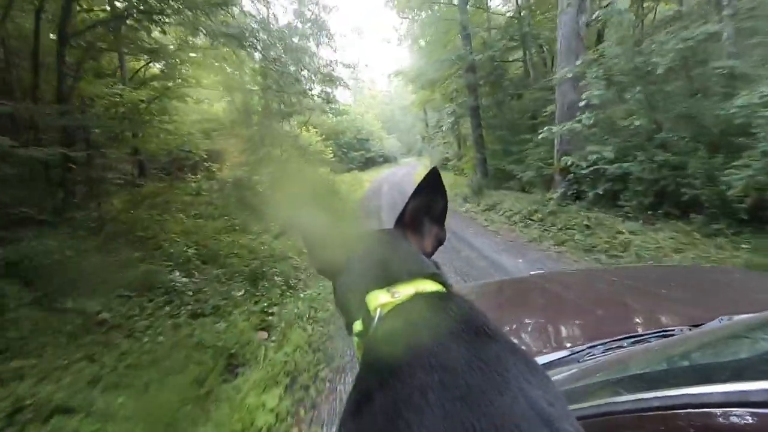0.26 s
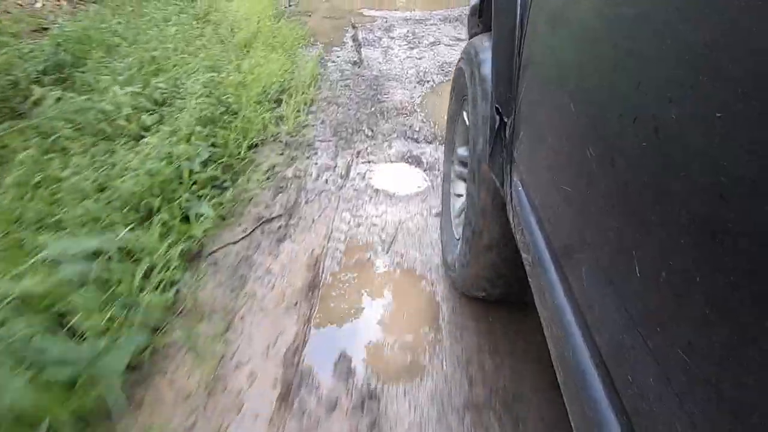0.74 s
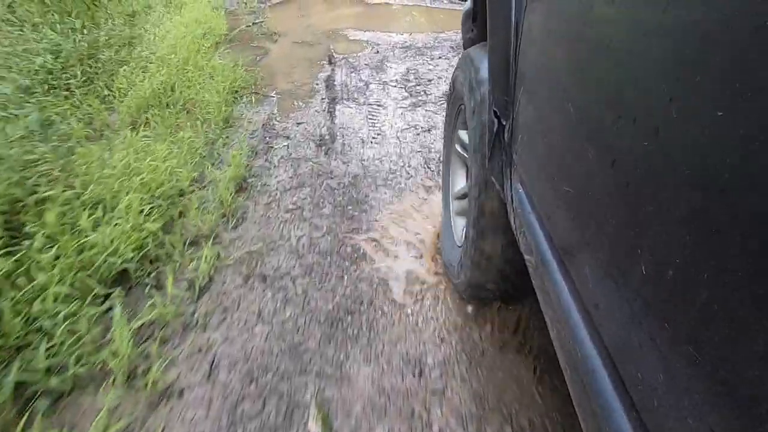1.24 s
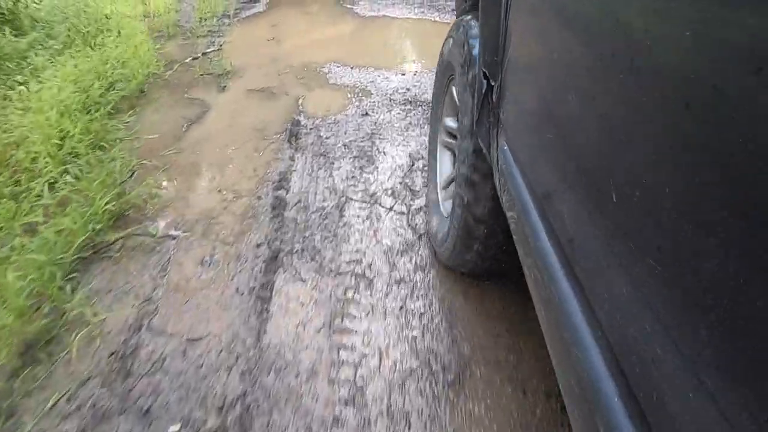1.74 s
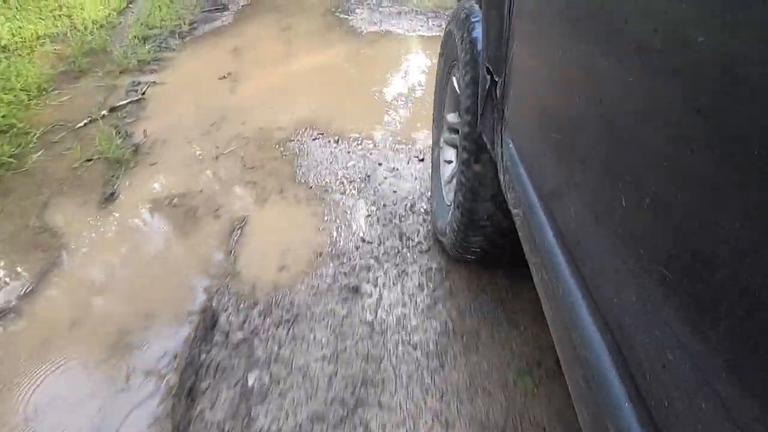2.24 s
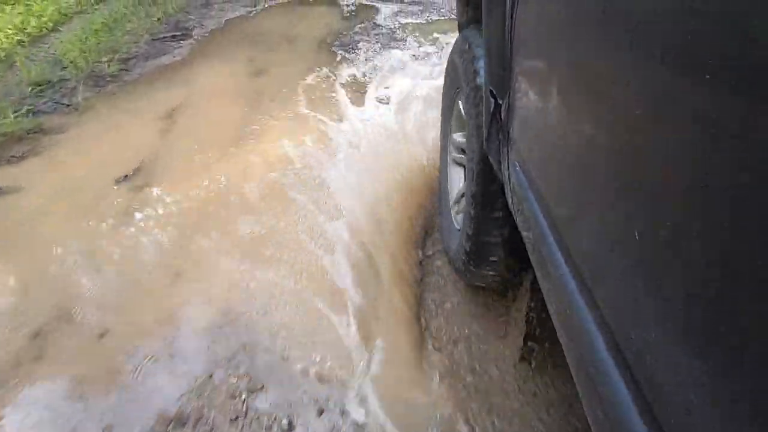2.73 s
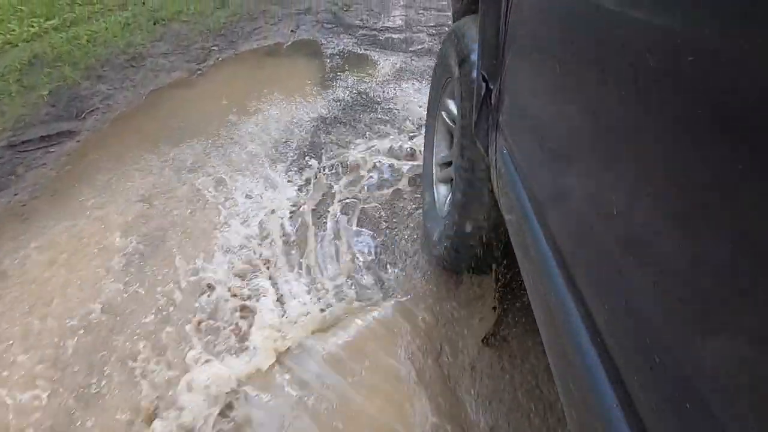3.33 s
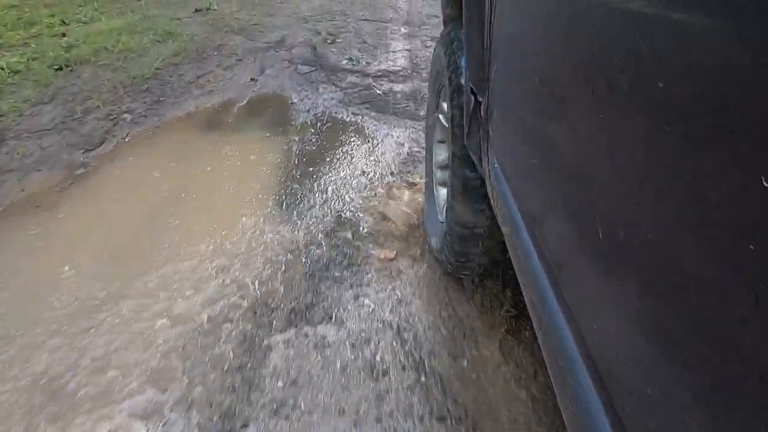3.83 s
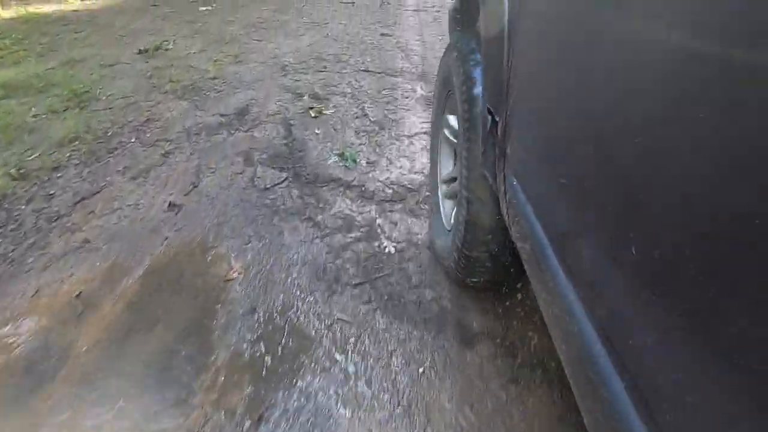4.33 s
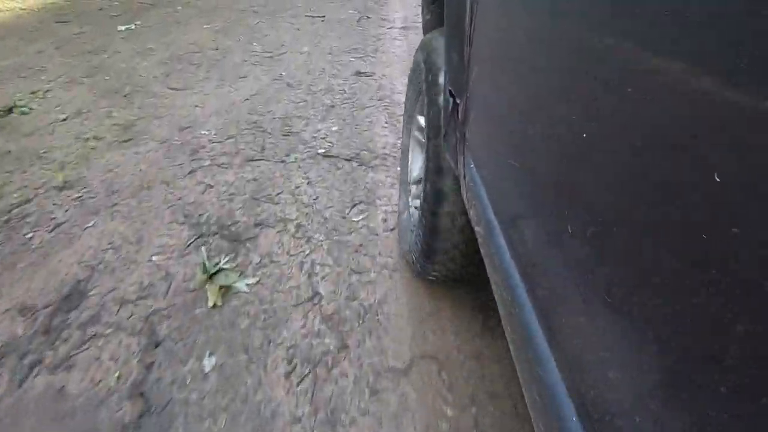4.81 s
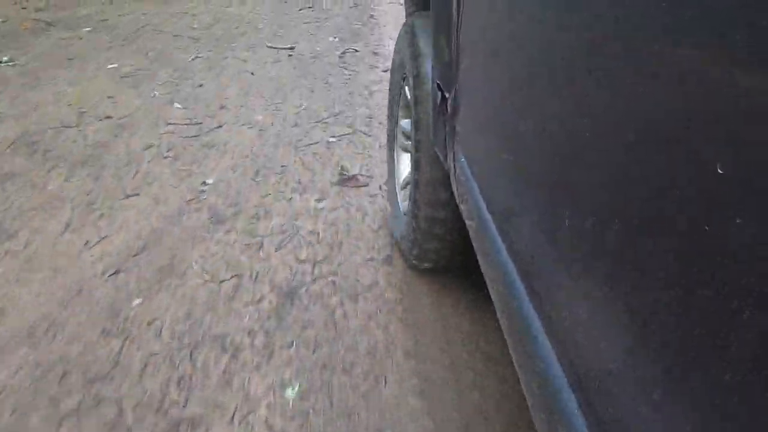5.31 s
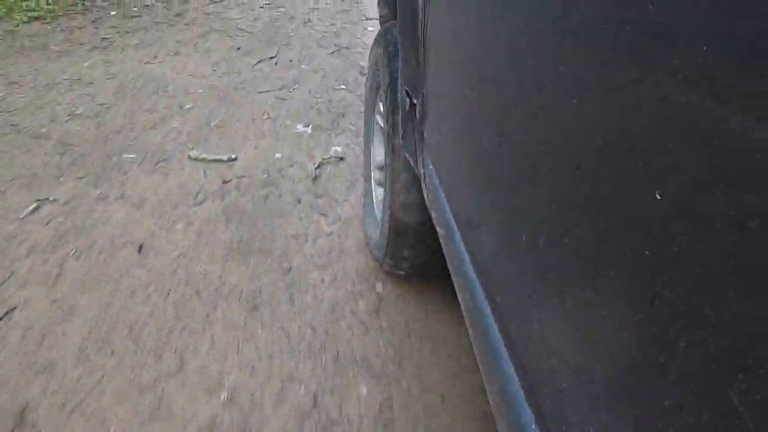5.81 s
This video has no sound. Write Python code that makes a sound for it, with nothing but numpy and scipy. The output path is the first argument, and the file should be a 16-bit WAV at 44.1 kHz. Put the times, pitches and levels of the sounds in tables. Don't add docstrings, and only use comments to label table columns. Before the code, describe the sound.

From 0 to 0.5 s, strong muffled wind buffets a small camera on a moving pickup, with uneven low thumps, fluttering slaps and a few sharper flaps. At about 0.53 s it cuts with a small click to the front wheel, very close and dry. A low, even V8 idle drones under tyre rumble on mud; splashes, wet plops and gravel ticks cluster from 1.1 to 1.6 s, then thin out around 2 s. From 2.4 s water froths, and between 2.75 and 3.5 s a deep puddle bursts in heavy plops, slosh and spray. The engine revs up from 3 s into a rougher burble, dips slightly near 4.5 s, then climbs again. From 3.3 to 4.35 s dull mono opens into brighter stereo. A hissing spray passes at 4.3-4.7 s; damp road noise, occasional plops, grit and soft wind puffs continue until the cut at 6 s.

```python
import sys
import numpy as np
from scipy import signal
from scipy.fft import rfft, irfft
from scipy.io import wavfile
from scipy.ndimage import uniform_filter1d

SR = 44100
rng = np.random.default_rng(int(sys.argv[2]) if len(sys.argv) > 2 else 0)


def wrap_up_sound(samples):
    columns = np.atleast_2d(samples).T
    tamed = np.clip(columns, -1, 1)
    steps = np.round(tamed * 32767).astype(np.int16)
    wavfile.write(sys.argv[1], SR, steps)


def ratio_of_db(decibels):
    return 10 ** (np.asarray(decibels, float) / 20)


N = 267246
T = np.arange(N) / SR
CUT_S, SPLICE_S = .5283, .002


def wheel():
    mid, side = tyre()
    impacts = plops()
    low_share = pair_shares()[0]
    bass_share = np.maximum(low_share - BASS_LATE, 0)
    return mid + impacts, side + bass_share * (puffs() - 0.41 * impacts)


# t/s, firmness as rumble level/dB
GROUND = [(.55, -37), (1.0, -32), (1.25, -30), (1.5, -29.5), (1.8, -29), (2.2, -32.5), (2.35, -28.5),
          (2.42, -40), (2.76, -31.5), (2.88, -28), (3.45, -27), (3.65, -29.5), (4.15, -26.5), (4.5, -28),
          (5.2, -29), (5.6, -28.5), (6.06, -28)]
# t/s of the peak, spray level/dB, rise/s, fall/s, depth as slosh over spray/dB
SPLASHES = [(.541, -29.5, 0.027, 0.0094, -7), (.79, -33.5, 0.36, 0.16, -7), (.93, -49, 0.018, 0.026, 17.5),
            (1.19, -28.5, 0.014, 0.04, -2), (1.309, -30.5, 0.13, 0.21, -1), (1.45, -32, 0.098, 0.14, -9),
            (1.569, -34, 0.074, 0.071, 1.5), (1.73, -33, 0.091, 0.15, -4), (2.2, -48.5, 0.17, 0.16, 16.5),
            (2.31, -34, 0.012, 0.067, 4), (2.389, -39.5, 0.019, 0.12, 13.5), (2.54, -40, 0.11, 0.13, 12.5),
            (2.63, -37.5, 0.076, 0.13, -16), (2.78, -37, 0.097, 0.022, 13),
            (2.87, -40.5, 0.041, 0.087, 17.5), (2.97, -48.5, 0.055, 0.48, 21), (2.7, -42, 0.042, .05, 12),
            (3.06, -36, 0.031, 0.051, 8), (3.21, -45.5, 0.03, 0.023, 22), (4.46, -35.5, 0.026, 0.15, -21),
            (4.62, -32, .04, .06, -19), (5.2, -34.5, .06, 0.087, 2), (5.62, -36.5, .05, 0.13, -10),
            (5.94, -42, 0.036, .04, -9), (3.47, -32.5, 0.033, 0.063, -5), (3.25, -30.5, 0.66, 0.34, -1.5),
            (3.435, -34.5, 0.038, 0.038, 7), (3.8, -37, 0.028, 0.24, 6.5), (4.1, -39.5, 0.41, 0.47, 8.5),
            (4.4, -52, 0.097, 0.17, 8), (4.72, -34.5, 0.28, 0.053, -0.5), (4.9, -38, 0.073, 0.3, 4.5),
            (5.08, -49, 0.042, 0.12, 19)]
# t/s of the peak, level/dB, rise/s, fall/s
MIST = [(1.2, -57, 0.012, 0.039), (1.42, -59, 0.068, 0.15), (1.57, -61, 0.06, 0.068),
        (2.31, -51, 0.009, 0.031), (2.39, -56, 0.035, 0.017), (2.97, -55, 0.056, 0.042),
        (3.25, -52, 0.22, 0.41), (3.44, -49.5, .021, 0.18), (3.79, -47, 0.0068, 0.047),
        (4.2, -44, 0.24, 0.24), (4.32, -38, 0.037, 0.065), (4.49, -33, 0.11, 0.23),
        (4.95, -42, 0.073, 0.07), (5.18, -43, 0.13, 0.77), (5.93, -38, 0.028, 0.028)]
# level/dB at the sheltered port, level/dB at the open pair
DAMP = [
    (-40, -35),
    (-48, -38),
    (-65.5, -51),
]
WHEEL_HZ = [300, 900, 2700, 8500, 12000]
# f/Hz, level/dB a third octave against
ROLLING_COLOUR = [(25, -16), (40, -8), (70, -1.5), (110, -4.5), (170, -3.5),
                  (250, -6), (400, -7.5), (600, -7.5), (900, -6), (1500, -4), (2350, -3), (3700, -4.5),
                (4700, -7), (5900, -7.5), (7450, -5), (9400, -5.5), (11800, -9.5), (14900, -17)]


def tyre():
    opened = pair_shares()[1] / BLEND[-1][2]
    slosh_floor, spray_floor, hiss_floor = [shut + opened * (wide - shut) for shut, wide in DAMP]
    slosh_rows = [(s, db + depth, rise, fall) for s, db, rise, fall, depth in SPLASHES]
    spray_to_hiss_db = -31.5
    hiss_rows = [(s, db + spray_to_hiss_db, rise, fall) for s, db, rise, fall, _ in SPLASHES]

    rumble = curves(GROUND)[0] - walk(10, N)
    slosh = swells(slosh_floor, slosh_rows)
    spray = swells(spray_floor, [row[:4] for row in SPLASHES])
    hiss = swells(hiss_floor, MIST + hiss_rows)
    finest = 0.71 * spray + 0.27 * hiss - 17.0 + 1.5 * walk(30, N)
    return texture([rumble, slosh, spray, hiss, finest], WHEEL_HZ, ROLLING_COLOUR,
                   grain=0.44, rate=1200., spread_db=4.5, surge_db=0.88, surge_rate=30., flicker_db=0.85)


# t/s, peak level/dB, f/Hz
PLOPS = [(0.695, -22, 1870), (0.915, -20, 1090), (1.161, -18, 790), (1.274, -14, 1800), (1.32, -16, 3330),
         (1.358, -15, 1890), (1.573, -18, 2810), (2.757, -5, 790), (2.79, -12, 700), (2.996, -7, 560),
         (3.033, -13.5, 2160), (3.079, -8, 580), (3.143, -14, 2210), (3.215, -13, 910), (3.245, -23, 2480),
         (3.505, -20, 700), (4.795, -23, 700), (4.851, -16, 700), (5.061, -16, 795), (5.325, -21, 738),
         (5.633, -15.5, 1410), (6.017, -20, 1010), (0.987, -9, 1040), (0.997, -19.5, 2020),
         (3.44, -15, 1420), (1.138, -22, 1000), (1.19, -12, 1050), (1.254, -11.5, 1910),
         (1.303, -10.5, 840), (1.306, -10, 1990), (1.435, -16, 2500), (1.52, -17, 2460), (1.538, -13, 2300),
         (1.811, -17, 1050), (1.837, -21, 750), (2.244, -15.5, 1020), (2.385, -8.5, 1050),
         (2.535, -19, 1130), (2.838, -7, 950), (2.86, -12, 1060), (2.956, -6, 865), (3.292, -6, 1290),
         (3.432, -6, 686), (3.568, -16, 1010), (3.69, -15, 710), (3.792, -12.5, 1290), (3.906, -9, 1000),
         (4.045, -15, 2820), (4.215, -15, 1270), (4.242, -20, 920), (4.591, -18, 940), (4.682, -14.5, 970),
         (5.082, -10, 710), (5.977, -20, 1410)]
# t/s, peak level/dB, f/Hz
GRIT = [(0.5423, -20, 1850), (0.62, -16, 1870), (0.7292, -17.5, 2440), (1.1816, -20, 2750),
        (1.243, -19, 1980), (1.3042, -15, 2630), (1.3503, -19, 1910), (1.5133, -19, 2570),
        (1.6556, -28, 1880), (1.6751, -19, 1840), (1.8906, -27, 2840), (2.2238, -21, 1960),
        (2.299, -22, 2330), (2.3795, -22, 1950), (2.4853, -26, 1860), (2.5487, -14, 2460),
        (2.675, -27, 1960), (2.709, -22, 2160), (2.7646, -15, 1560), (2.805, -11, 1900), (3.245, -19, 1770),
        (3.9305, -26, 1810), (4.0791, -31, 1630), (4.3316, -18, 3230), (4.4413, -17, 3350),
        (4.7486, -18, 2050), (5.2694, -17, 2360), (5.442, -17, 2200), (5.5764, -21, 1600)]
# start t/s, end t/s, first f/Hz, last f/Hz, level/dB
FROTH = [(2.5, 2.741, 2960, 1077, -20), (2.721, 2.951, 1295, 805, -21.5), (2.952, 3.252, 910, 700, -22.5),
         (4.435, 4.758, 3300, 2310, -23), (2.378, 2.511, 2500, 1590, -21), (2.542, 2.82, 2570, 1890, -18.5),
         (3.007, 3.303, 2400, 3360, -22), (3.272, 3.508, 2600, 3400, -20), (0.554, 0.854, 3180, 2860, -32),
         (1.204, 1.601, 3200, 2830, -22), (1.642, 1.817, 2570, 2200, -29), (2.641, 2.818, 1470, 700, -24.5),
         (3.028, 3.128, 1280, 700, -24.5), (3.179, 3.261, 890, 612, -28), (3.034, 3.065, 3600, 3430, -28),
         (3.164, 3.279, 3800, 3770, -25), (3.425, 3.519, 3680, 3500, -24), (3.781, 4.299, 1500, 1100, -28),
         (4.415, 4.6, 3450, 3000, -21.5), (5.002, 5.351, 1490, 1100, -32)]


def plops():
    out = ratio_of_db(-4.5) * knocks([(*row, 0.024) for row in PLOPS], glide=0.14, crack=0.87)
    out += ratio_of_db(-2.0) * knocks([(*row, .015) for row in GRIT], glide=0.055, crack=0.91)
    bubbles = np.vstack([froth(*row) for row in FROTH])
    return out + knocks(bubbles, glide=0.13, crack=0.26)


def froth(start, end, first_hz, last_hz, db):
    count, octaves = 70, 0.82
    at, off, big = rng.random((count, 3)).T
    hz = first_hz * (last_hz / first_hz) ** at * 2 ** (octaves * (off - .5))
    return np.c_[start + at * (end - start), db - 9 * big, hz, 32 / hz]


# t/s, cycles a second/Hz, level of the strongest line/dB
ENGINE = [(0.6, 6.004, -23), (0.9, 6.02, -20), (1.2, 5.85, -20.6), (1.5, 5.893, -20.5), (2.1, 5.965, -18.3),
          (2.9, 5.885, -20.5), (3.0, 6.325, -20), (3.25, 8.08, -15.5), (3.4, 8.818, -21.6),
          (3.5, 9.076, -21.1), (3.8, 9.29, -20.3), (4.0, 9.92, -18.8), (4.25, 10.02, -23.3),
          (4.55, 9.12, -25.6), (4.7, 9.195, -23), (5.0, 9.965, -20.3), (5.5, 10.32, -22),
          (6.06, 10.68, -23)]
# cycles a second/Hz, twice the firing rate against the burble/dB
HANDOVER = [(7.8, 14), (8.3, 11), (8.8, 1.5), (9.1, -3), (10, -6.5), (10.6, -7)]
BANKS = [1, -1, -1, 1, -1, 1, 1, -1]
UNEVEN = [.25, -.1, .05, -.2, .1, .15, -.25, .4]
ORDERS = [5, 7, 8, 9, 10, 12, 13, 14, 15, 17, 18, 19, 20, 21, 24, 29, 32]
# level/dB idling, level/dB pulling against the burble
ORDERS_DB = [(-36, -12), (-39, -15.5), (-27, -10), (-37, -9), (-47, -24), (-49, -16), (-34.5, -5.5),
             (-42, -31), (-29.5, -16), (-31.5, -23), (-36.5, -20.5), (-32, -19), (-36, -19.5), (-27, -18),
             (-28.5, -32), (-39, -33), (-38.5, -23)]
# multiple of the cycle, level/dB idling, level/dB pulling
BELT = [(4.8, -50, -31), (7.2, -44, -34), (16.8, -55, -41), (26.4, -50, -35), (28.8, -50, -41),
        (43, -40.5, -58)]


def engine():
    rate, level_db = curves(ENGINE)
    lead_db = np.interp(rate, *np.transpose(HANDOVER))
    double_db = level_db + np.minimum(lead_db, 0)
    burble_db = level_db - np.maximum(lead_db, 0)
    pull = np.clip((rate - 6.6) / 2.3, 0, 1)
    strain = np.clip((rate - 8.7) / .7, 0, 1)

    angle = 2 * np.pi * (np.cumsum(rate) / SR + .339) + .16 * pull
    pipe = .25 * (1 - 2 * pull)
    pattern = np.angle(np.fft.fft(np.add(BANKS, UNEVEN)))
    out = ratio_of_db(double_db) * np.cos(16 * angle + pipe + .4 * (1 - pull))
    out += ratio_of_db(burble_db) * np.cos(11 * angle + pattern[3] + pipe)

    for k, (idle_db, pull_db) in zip(ORDERS, ORDERS_DB):
        sign = -1 if k == 8 else 1
        calm = sign * (1 - pull) * ratio_of_db(idle_db)
        busy = pull * ratio_of_db(pull_db + burble_db - 2.0)
        waver = ratio_of_db(1.5 * walk(6, N) - .7)
        phase = pattern[k % 8] + pipe + .3 * walk(4, N)
        out += waver * (calm + busy) * np.cos(k * angle + phase)

    for k, idle_db, pull_db in BELT:
        load = pull if pull_db < idle_db else strain
        belt_db = idle_db + load * (pull_db - idle_db + .6 * (level_db + 22))
        out += ratio_of_db(belt_db) * np.sin(k * angle)
    return np.sqrt(2) * ratio_of_db(1.8) * out


# t/s, strength level/dB
GUST = [
    (0, -4.5),
    (.045, -3),
    (.07, 3.5),
    (.084, -28),
    (.092, -0.5),
    (.3, -0.5),
    (.335, -0.5),
    (.4, 1),
    (.5, -0.2),
]
GUST_HZ = [90, 410, 2040]
GUST_DB = [-16, -26.5, -43.5]
GUST_REACH = [0.46, 2.1, 0.58]
EDDY_DB = [-8, -10.5, -26]
# f/Hz, level/dB a third octave against its part
GUST_COLOUR = [(25, -16), (50, -9.5), (100, -5.5), (200, -7), (450, -4.5), (900, -6), (2200, -6),
               (3500, -13.5), (5000, -23.5), (8000, -19), (15000, -49)]
# t/s, slap peak level/dB, f/Hz, thump level/dB
SLAPS = [(0.018, -16, 710, -31), (0.066, -16, 498, -12.5), (0.089, -7.5, 600, -8), (0.105, -19, 420, -3.5),
         (0.12, -10, 496, -23), (0.132, -6.5, 410, -8), (0.16, -18, 740, -22), (0.179, -9, 410, -27),
         (0.191, -10, 616, -15), (0.232, -11, 393, -12), (0.253, -24, 574, -14), (0.273, -15, 750, -20),
         (0.293, -8.5, 433, -13), (0.308, -32.5, 455, 0), (0.355, -12.5, 786, -10.5), (0.4, -31, 350, -30),
         (0.422, -11.5, 510, -12), (0.437, -28, 541, -9), (0.468, -7, 427, -21), (0.481, -32, 420, -21),
         (0.501, -30, 433, -9.5)]
# t/s, peak level/dB, f/Hz
FLAPS = [(0.0694, -22.5, 2030), (0.0904, -33, 2600), (0.134, -15.5, 1760), (.1595, -24, 1950),
         (.2294, -29, 1610), (0.2923, -32, 1600), (0.3536, -28, 1600), (0.4194, -18.5, 1760),
         (0.472, -37, 2240), (.4923, -36, 1500)]


def window():
    size = int((CUT_S + SPLICE_S) * SR) + 1
    rise_s, fall_s = 0.0045, 0.015
    levels = []
    for steady, eddy, reach in zip(GUST_DB, EDDY_DB, GUST_REACH):
        rows = [(s + rise_s, db + eddy, rise_s, fall_s) for s, db, *_ in SLAPS]
        levels.append(swells(reach * curves(GUST)[0] + steady, rows)[:size])
    mid, _ = texture(levels, GUST_HZ, GUST_COLOUR, grain=0.35, rate=540.0, spread_db=6.5,
                     surge_db=1.0, surge_rate=41.4, flicker_db=0.5)

    slaps = [(*row[:3], 0.018) for row in SLAPS]
    thumps = [(s, db + 4.5, 135., .033) for s, *_, db in SLAPS]
    flaps = [(*row, .022) for row in FLAPS]
    out = knocks(slaps, glide=-0.15, crack=0.77, rise_s=.0012)
    out += knocks(thumps, glide=0.13, crack=0.81)
    out += ratio_of_db(-1.0) * knocks(flaps, glide=-.1, crack=1.2, rise_s=0.0016)
    out[:size] += mid
    squash = .75
    shelter = signal.butter(4, 4800, fs=SR, output="sos")
    return signal.sosfilt(shelter, np.tanh(squash * out) / squash)


# t/s of the peak, level/dB, rise/s, fall/s
PUFFS = [(3.97, -28, 0.033, .04), (4.08, -34, .03, 0.036), (4.2, -40, .03, .04), (5.17, -31, .03, 0.029),
         (4.8, -35, .05, .06), (5.05, -34, 0.21, 0.18), (5.54, -31, .06, 0.038), (5.82, -28, 0.078, 0.061),
         (6.02, -29, 0.067, 0.086)]


def puffs():
    bands_hz = (45., 71.3, 88.6, 118.0, 150., 189.0, 257.0)
    noise = sum(third(rng.standard_normal(N), hz) for hz in bands_hz)
    return ratio_of_db(swells(-63, PUFFS)) * noise


# t/s, share below the crossover, share above it
BLEND = [
    (2.9, 0, 0),
    (2.97, 0, .06),
    (3.06, 0, 0),
    (3.19, 0, 0),
    (3.3, 0.012, 0.23),
    (3.5, .05, .25),
    (3.77, 0.08, 0.27),
    (3.82, 0.33, 0.65),
    (4.1, 0.35, 0.55),
    (4.35, 0.73, 0.8),
]
BASS_HZ, BASS_LATE = 450, .08


def pair_shares():
    return curves(BLEND)


# f/Hz, lean to the right (0-1), unrelated part against mid/dB
PAIR = [(40, 0, -1.5), (151, 0.05, -19), (400, 0, -16), (700, 0.18, -4), (1290, 0.82, -4),
        (2400, 0.71, -2.5), (3500, 0.26, -1.5), (4130, 0, -13), (4850, 0.34, 2), (8000, 0.9, 5),
        (11000, 0, -5.5), (15000, .1, -4)]
# f/Hz, level/dB
SHELTER = [
    (2900, 0.7),
    (4400, 4.5),
    (5900, 0.5),
    (7500, 0),
]
THIRDS = 23.3 * 2 ** (np.arange(29) / 3)


def texture(levels, centres, colour, grain, rate, spread_db, surge_db, surge_rate, flicker_db):
    size = len(levels[0])
    mid, side = np.zeros(size), np.zeros(size)
    low_share, high_share = (c[:size] for c in pair_shares())
    surges = [walk(surge_rate, size) for _ in centres]
    broad = drops(rate, spread_db, size)
    broad_share = 0.27
    for hz in THIRDS:
        place = np.interp(np.log(hz), np.log(centres), np.arange(len(centres)))
        k = min(int(place), len(centres) - 2)
        lower = levels[k] + surge_db * surges[k]
        upper = levels[k + 1] + surge_db * surges[k + 1]
        db = (k + 1 - place) * lower + (place - k) * upper
        gain = ratio_of_db(db + flicker_db * walk(21.936, size))

        share = grain * min(hz / 500, 1, (3000 / hz) ** 0.6)
        noise = rng.standard_normal((2, size))
        own = drops(rate / 4, spread_db, size)
        impacts = np.sqrt(broad_share) * broad + np.sqrt(1 - broad_share) * own
        band = third(np.sqrt(1 - share) * noise[0] + np.sqrt(share) * impacts, hz)

        if hz < BASS_HZ:
            blend = np.maximum(low_share - BASS_LATE, 0)
        elif hz < 4000:
            blend = low_share
        elif hz < 11000:
            blend = high_share
        else:
            blend = 1
        mid += gain * band
        unrelated = ratio_of_db(on_log(hz, PAIR, column=2)) * third(noise[1], hz)
        side += blend * gain * (unrelated - on_log(hz, PAIR) * band)
    shut = 1 - low_share / BLEND[-1][1]
    mid, side = tint(mid, colour), tint(side, colour)
    return (1 - shut) * mid + shut * tint(mid, SHELTER), side


def knocks(table, glide, crack, rise_s=0.00092):
    out, t = np.zeros(N + 4096), np.arange(4096) / SR
    for s, db, hz, t60 in table:
        fade = np.exp(-np.log(1000) * t / t60) * (1 - np.exp(-t / rise_s))
        ring = np.sin(2 * np.pi * hz * t * (1 + glide * t / t60))
        around = signal.butter(2, [hz * 0.42, min(hz * 1.56, 3800)], "band", fs=SR, output="sos")
        soft = unit(signal.sosfilt(around, rng.standard_normal(4096)))
        start = int(s * SR)
        out[start:start + 4096] += ratio_of_db(db) * fade * (ring + crack * soft)
    return signal.sosfilt(signal.butter(4, 4000, fs=SR, output="sos"), out[:N])


def drops(rate, spread_db, size):
    out = np.zeros(size)
    at, sign, big = rng.random((int(rate * size / SR), 3)).T
    db = np.minimum(-spread_db * np.log(1 - big), 3 * spread_db)
    out[(at * size).astype(int)] = np.where(sign < .5, -1, 1) * ratio_of_db(db) * np.abs(2 * sign - 1)
    return unit(out)


def swells(floor_db, rows):
    t = T[::64]
    power = np.zeros(len(t))
    for s, db, rise, fall in rows:
        away = np.where(t < s, (s - t) / rise, (t - s) / fall)
        power += ratio_of_db(2 * db - 20 * away)
    return 10 * np.log10(ratio_of_db(2 * floor_db) + np.interp(T, t, power))


def walk(rate, size):
    k = int(SR / rate)
    held = np.repeat(rng.standard_normal(size // k + 1), k)[:size]
    return unit(uniform_filter1d(uniform_filter1d(held, k), k))


def third(x, hz):
    edges = [hz / 2 ** (1 / 6), hz * 2 ** (1 / 6)]
    sos = signal.butter(3, edges, "band", fs=SR, output="sos")
    return unit(signal.sosfilt(sos, np.r_[x[-8192:], x])[8192:])


def tint(x, table):
    hz = np.maximum(np.fft.rfftfreq(len(x), 1 / SR), 1)
    return irfft(rfft(x) * ratio_of_db(on_log(hz, table)), len(x))


def curves(table):
    s, *columns = np.transpose(table)
    return [np.interp(T, s, c) for c in columns]


def on_log(hz, table, column=1):
    table = np.array(table, float)
    return np.interp(np.log(hz), np.log(table[:, 0]), table[:, column])


def unit(x):
    return x / np.sqrt(np.mean(x ** 2))


def scene():
    mid, side = wheel()
    after = np.clip((T - CUT_S) / SPLICE_S, 0, 1)
    mid = after * (mid + engine()) + (1 - after) * window()
    mid += ratio_of_db(-15) * (T >= CUT_S) * (1 - after) ** 2
    mid += ratio_of_db(-73.5) * rng.standard_normal(N)
    mid -= ratio_of_db(-19.5) * np.exp(-T / .003)
    ending = np.clip((T[-1] - T) / SPLICE_S, 0, 1)
    mid, side = mid * ending, after * ending * side
    return np.array([mid + side, mid - side])


def roll_off(x):
    return signal.sosfilt(signal.butter(12, 15720, fs=SR, output="sos"), x)


def record(dry):
    top = signal.ellip(8, .2, 60, 15700, fs=SR, output="sos")
    mix = signal.sosfilt(top, np.tanh(0.77 * dry) / 0.92)
    return roll_off(mix)


dry = scene()
out = record(dry)
wrap_up_sound(out)
```